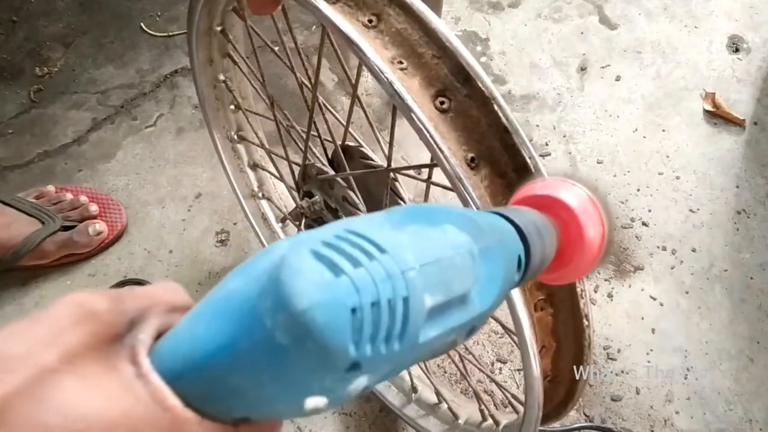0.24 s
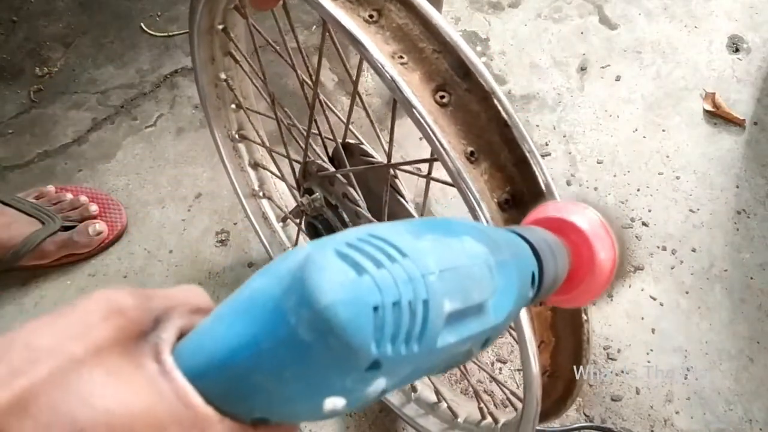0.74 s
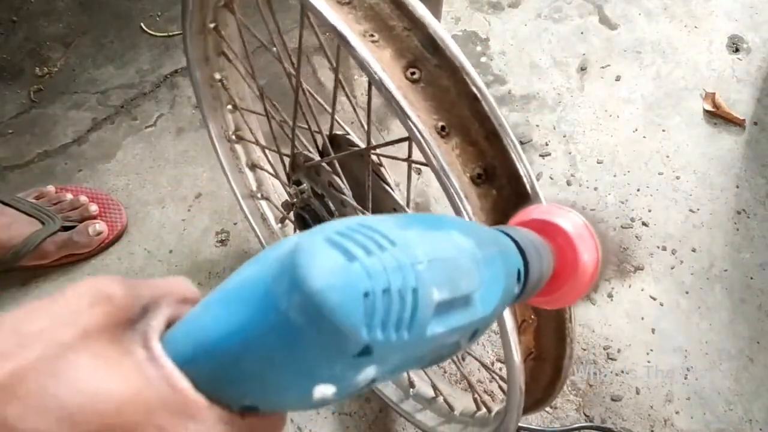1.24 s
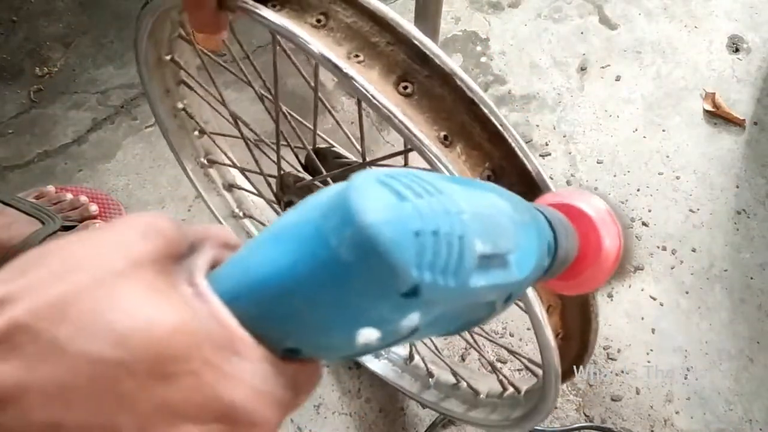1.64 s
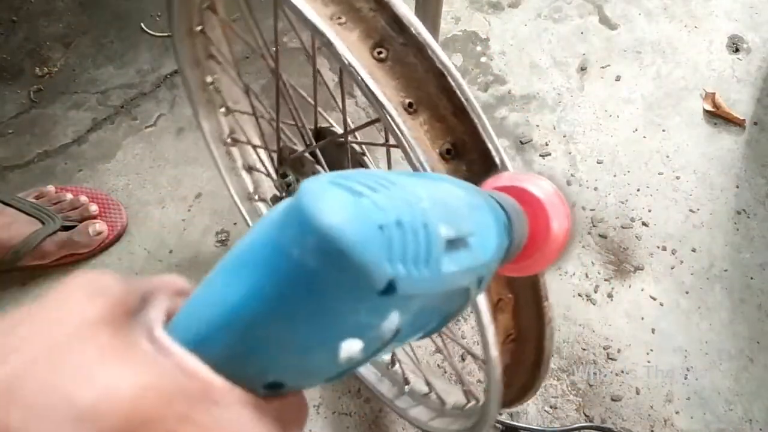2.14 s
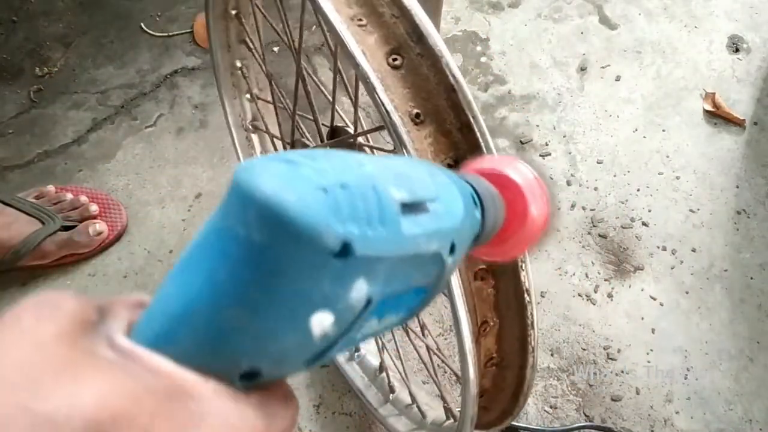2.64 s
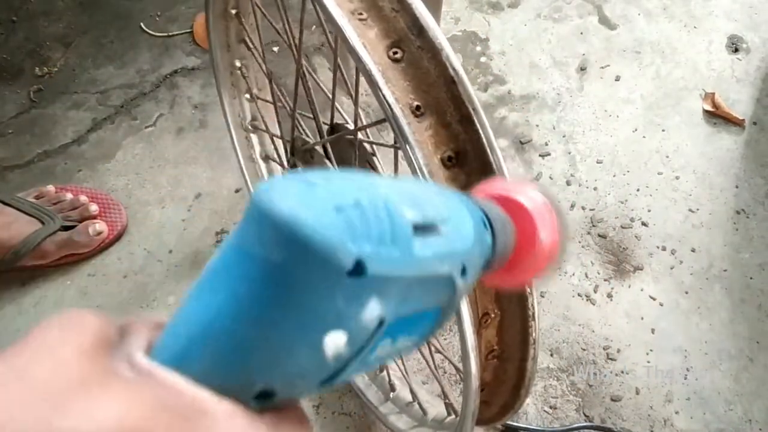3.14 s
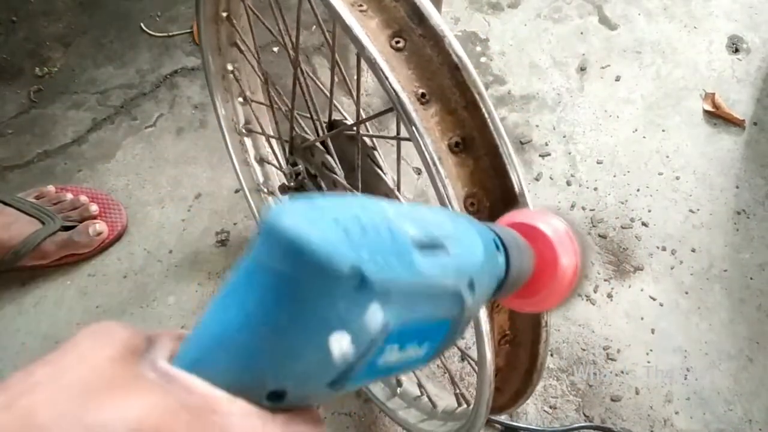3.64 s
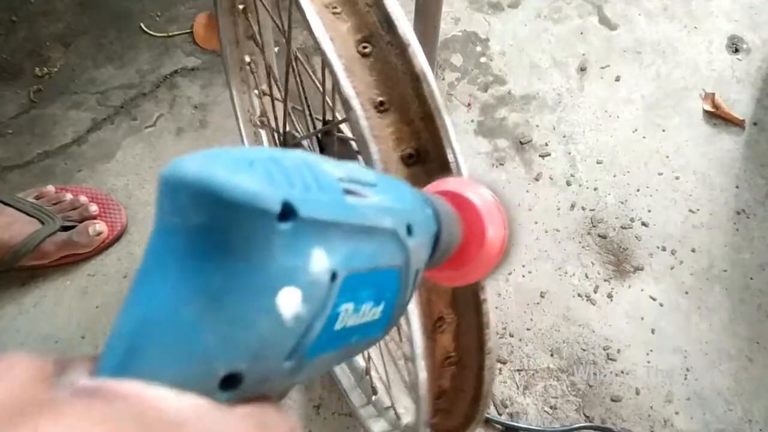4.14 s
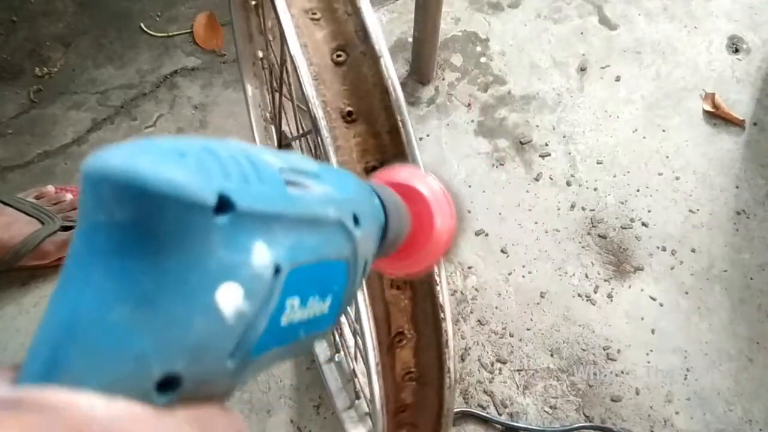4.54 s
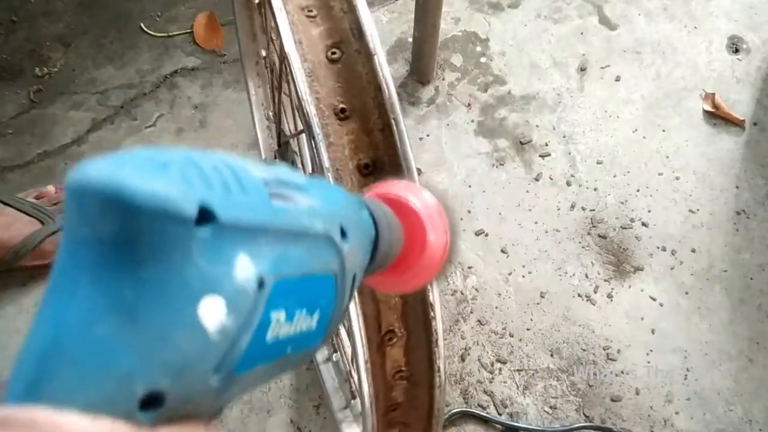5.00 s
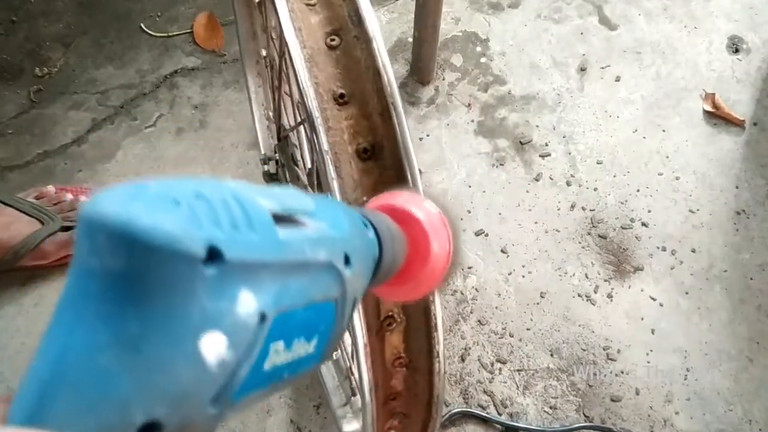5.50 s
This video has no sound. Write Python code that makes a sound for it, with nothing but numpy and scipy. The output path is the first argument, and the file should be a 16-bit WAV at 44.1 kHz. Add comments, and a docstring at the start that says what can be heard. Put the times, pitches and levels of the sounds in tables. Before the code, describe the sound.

An electric drill whines steadily while its spinning wire brush hisses and rasps on a rusty rim, with two spells of dull, bell-like metallic rattling.

```python
"""Wire cup brush on a rusty rim

A hand-held electric drill spins a wire cup brush on a steel wheel rim, close to the microphones.
The motor whines in multiples of its speed; its cooling fan is coloured noise.
The wires scratch out a rasp and a hiss, both modulated by the turning of an uneven cup.
In two stretches the brush rides the edge and bounces: decaying modes ring like a dull bell,
while stick-slip friction, noise through the same resonances, keeps the rim singing."""
import sys
import numpy as np
from scipy import signal
from scipy.fft import rfft, irfft, next_fast_len
from scipy.io import wavfile
from scipy.ndimage import uniform_filter1d, map_coordinates

SR = 44100
rng = np.random.default_rng(int(sys.argv[2]) if len(sys.argv) > 2 else 0)


def output_pcm(signal):
    """Save a mono or channel-first signal as 16-bit PCM at the path in sys.argv[1].

    Samples are clipped to [-1, 1] before scaling.
    """
    pcm = np.clip(np.atleast_2d(signal).T, -1, 1) * 32767
    wavfile.write(sys.argv[1], SR, np.round(pcm).astype(np.int16))


N = 254060


def amp(db):
    """Decibel law: 20 dB is a tenfold amplitude."""
    return 10 ** (np.asarray(db) / 20)


def unit(x):
    """Normalisation to an rms of 1."""
    return x / np.sqrt(np.mean(x ** 2) + 1e-20)


def along(points, hz):
    """Interpolation of (frequency, value) points on a logarithmic frequency axis."""
    f, v = np.transpose(points)
    return np.interp(np.log(hz + 1), np.log(f + 1), v)


def curves(rows):
    """Linear interpolation in time: one value per sample for each column after the time."""
    s, *columns = np.transpose(rows)
    t = np.arange(N) / SR
    return [np.interp(t, s, column) for column in columns]


def bump(middle, half_length):
    """Gaussian envelope: a smooth rise to 1 and fall around a moment."""
    return np.exp(-((np.arange(N) / SR - middle) / half_length) ** 2)


def wobble(rate):
    """Band-limited random fluctuation: a smooth curve through rate random knots a second."""
    at = np.arange(N) * rate / SR
    steps = np.arange(0, at[-1] + 1, 1 / 10)
    knots = rng.standard_normal(int(at[-1]) + 4)
    return np.interp(at, steps, map_coordinates(knots, [steps]))


def filtered(x, response):
    """Linear filtering: the spectrum of x times a response of frequency."""
    m = next_fast_len(N + SR // 2)
    return irfft(rfft(x, m) * response(np.fft.rfftfreq(m, 1 / SR)), m)[..., :N]


def staggered(pair, lead):
    """Inter-channel phase: left leads right by a phase in radians that depends on frequency."""
    sides = np.array([[1], [-1]])
    return filtered(pair, lambda hz: np.exp(.5j * sides * lead(hz)))


# likeness of the two channels, 1 for identical and 0 for unrelated
# columns: frequency_hz, likeness
LIKENESS = [(60, 0.71), (150, 0.73), (380, 0.94), (700, 0.94), (1290, 0.86), (1800, 1), (2400, 0.3),
            (4400, 0)]


def spread(pair):
    """Stereo coherence: left and right most alike mid-range, less in the bass, unrelated in high treble."""
    def mid_side(hz):
        turn = np.arccos(np.clip(along(LIKENESS, hz), 0, 1)) / 2
        return np.array([np.cos(turn), np.sin(turn)])
    mid, side = filtered(pair, mid_side)
    return np.array([mid + side, mid - side])


def rush(spectrum, grain_db, patchy_db):
    """Shaped noise: uneven grains with random, slowly changing level patches over time and frequency."""
    grains = rng.standard_normal((2, N)) * amp(grain_db * wobble(3000))
    z = signal.stft(grains, nperseg=2048)[2]
    field = rng.standard_normal(z.shape)
    field = uniform_filter1d(field, size=3, axis=1)  # over frequency
    field = uniform_filter1d(field, size=24, axis=2)  # over time
    patchy = signal.istft(z * amp(patchy_db * unit(field)), nperseg=2048)[1][:, :N]
    coloured = filtered(patchy, lambda hz: amp(along(spectrum, hz)))
    return unit(spread(coloured))


# colour of the cooling air; columns: frequency_hz, relative_level_db
AIR_COLOUR = [(25, -21), (60, -29), (150, -22.5), (280, -14), (420, -10.5), (530, -4), (800, -5), (920, 3),
              (1120, 1), (1550, 6), (2100, 0.5), (2800, -6), (3120, -19), (3700, -23), (15000, -78)]
# how openly the vents face the microphones as the drill is turned; columns: time_s, opening_db
VENT_OPENING = [(0, -3.5), (.8, -2), (1.3, -1.5), (2.1, 0), (2.8, -2.5), (3.4, -4.5), (4, -0.5), (5, -1),
                (5.76, -0.5)]
FAN_DB, FAN_LAG_S = -40, 0.0001  # level at full vent opening; the left hears the fan this much later


def fan():
    """Turbulence noise: cooling air rushes through the housing, louder as the vents face us."""
    level_db = FAN_DB + curves(VENT_OPENING)[0] + 0.76 * wobble(16)
    air = amp(level_db) * rush(AIR_COLOUR, grain_db=1.5, patchy_db=2.5)
    return staggered(air, lambda hz: -2 * np.pi * hz * FAN_LAG_S)


def mains():
    """Alternating-current torque: a sine of two pulses in each mains cycle."""
    return np.sin(2 * np.pi * 100 * np.arange(N) / SR)


# the motor runs up, then slows where the brush is loaded; columns: time_s, speed_turns_per_s
MOTOR_SPEED = [(0, 469), (.13, 485), (.3, 499.5), (.65, 518), (.95, 526.8), (1.5, 538.6), (1.8, 547),
               (2.05, 552), (2.55, 541), (3.05, 527), (3.3, 512), (3.55, 502), (3.95, 507), (4.25, 505),
               (4.55, 508.3), (5.04, 516.5), (5.35, 517), (5.55, 524), (5.76, 528)]


def motor_angle(ripple=0.00099):
    """Phase as the integral of speed: the speed shivers with the load and the torque pulses."""
    shiver = .0023 * wobble(110)
    speed = curves(MOTOR_SPEED)[0] * (1 + shiver + ripple * mains())
    return 2 * np.pi * np.cumsum(speed) / SR


# gear and commutator tones, each a steady core in a rough skirt
# columns: multiple_of_motor_speed, level_db, gain_db_per_db_of_vent_opening, skirt_over_core_factor
MOTOR_TONES = [(1, -57, 4, 0.57), (3, -52.5, 0, 0.7), (6, -49, 3.5, 1.1), (9, -55.5, 3.5, 1.2),
               (12, -46.5, 0.7, 0.67), (15, -56, 1, 2.5), (18, -45, 2.8, 1.3), (24, -54, 2, 1.2)]
# single tones sing out for a while
# columns: multiple_of_motor_speed, middle_s, half_length_s, gain_db
TONE_SWELLS = [(3, 3.3, 1, 10.5), (6, 5.12, 0.65, 6.5), (9, 5.3, 0.82, 9), (12, 0.042, 0.18, 5),
               (12, 4, 0.34, 3), (12, 5.25, 0.45, 8), (15, 2.35, 1, 15), (18, 4.83, 0.62, 6.5),
               (24, 4.7, 0.66, 9)]


def whine(angle, drift_db=4.0, throb=0.14):
    """Harmonics of rotation: tones at multiples of the motor speed, by separate paths to each side."""
    def tone(order, rough):
        drift = amp(drift_db * np.array([wobble(8.2), wobble(11.0)]))
        core = drift * np.exp(1j * np.array([wobble(5.4), wobble(6)]))
        skirt = rough * np.array([wobble(280) + 1j * wobble(280) for _ in range(2)])
        wave = np.real((core + skirt) * np.exp(1j * order * angle))
        return unit((1 + throb * mains()) * wave)

    def swell_db(order):
        return sum(db * bump(s, half) for k, s, half, db in TONE_SWELLS if round(k) == order)

    opening_db, = curves(VENT_OPENING)
    out = amp(-80.0) * mains()  # faint hum
    for multiple, db, follow, rough in MOTOR_TONES:
        order = round(multiple)
        level_db = db + follow * opening_db + swell_db(order)
        out = out + amp(level_db) * tone(order, rough)
    return out


# the cup digs in (positive) or skips clear (negative) for a moment
# columns: middle_s, half_length_s, pressure_db
PRESSURE_SHOVES = [(.01, 0.017, 2.5), (.34, 0.041, 1), (.65, 0.021, 2.5), (1.152, 0.012, -1.5),
                   (1.233, 0.019, -4), (1.259, .012, 3), (1.3, .018, -3.5), (1.416, 0.051, 2),
                   (2.384, 0.016, 1), (2.425, .012, -3), (2.52, 0.015, 0.5), (2.64, 0.017, -0.5),
                   (2.72, 0.018, 1.5), (2.828, 0.038, -3.5), (2.885, 0.011, 1), (3.0, 0.014, -2),
                   (3.062, 0.0065, 2.5), (3.14, .012, -2), (3.176, 0.013, 0), (3.24, 0.017, 1.5),
                   (3.296, 0.012, -2.5), (3.365, .012, -1.5), (3.418, 0.023, -1.5), (3.46, .012, -1),
                   (3.62, .012, 0), (3.707, 0.023, -3.5), (3.765, .018, 0), (3.84, 0.045, -2)]


def shoves_db():
    """Contact force: the pressure gained or lost as the cup digs in and skips clear."""
    return sum(db * bump(s, half) for s, half, db in PRESSURE_SHOVES)


CATCH_S = 0.09  # time to slip on or off the edge


def on_edge(start, end):
    """Change of contact: 0 on the rim's face, 1 while the brush rides on its edge."""
    t = np.arange(N) / SR
    return np.clip(.5 + np.minimum(t - start, end - t) / CATCH_S, 0, 1)


# the rim's modes, before a blow's own weighting and choking or the friction's bass cut
# columns: frequency_hz, relative_level_db, t60_s
RIM_MODES = [(1230, -9, .27), (1247, 1.5, .19), (1289, -3.5, .04), (1447, -1.5, .19), (1514, -15, .25),
             (1573, -2.5, .04), (1650, -16.5, .25), (1765, -3.5, .09), (1892, -8, .04), (2090, -20, .16),
             (2264, -8, .12), (2345, -15.5, .12), (2659, -4, .045), (2891, -15.5, .1), (2997, -12, .1),
             (3136, -7.5, .11), (3275, -14, .09), (3612, -8, .05), (4305, -9.5, .045)]
# the brush rides on the rim's edge
# columns: start_s, end_s, first_ringing_db, last_ringing_db, brightness_db_per_octave
EDGE_RIDES = [(0.012, 1.51, -36.5, -40, 5), (2.403, 3.837, -42.5, -41, 4)]
FACE_RING_DB = -51  # ringing on the flat face
SHOVE_RING = 0.86  # dB of singing in the rim for each dB of pressure


def drag(low_hz=1130, steadiness=0.79):
    """Stick-slip excitation: friction noise keeps the modes singing, most of all the long-ringing ones."""
    def resonance(f):
        power = 0
        for hz, db, t60 in RIM_MODES:
            half_width = np.log(1000) / (2 * np.pi * t60)
            power = power + t60 * amp(db) ** 2 / ((f - hz) ** 2 + half_width ** 2)
        return np.sqrt(power * f) * np.minimum(f / low_hz, 1) ** 6

    friction = rng.standard_normal((2, N)) * amp(3.5 * wobble(120))
    singing = unit(spread(filtered(friction, resonance)))
    # the wires brake a wide swing, so the singing stays fairly even
    energy = uniform_filter1d(np.mean(singing ** 2, axis=0), size=SR // 50)
    swing = np.sqrt(np.abs(energy) + 1e-6)
    singing = unit(singing / swing ** steadiness)
    out = amp(FACE_RING_DB) * singing
    for start, end, first_db, last_db, tilt_db in EDGE_RIDES:
        level_db, = curves([(start, first_db), (end, last_db)])
        tilt = lambda hz: amp(tilt_db * np.log2(np.maximum(hz / low_hz, 1)))
        out = out + on_edge(start, end) * amp(level_db) * unit(filtered(singing, tilt))
    return out * amp(SHOVE_RING * shoves_db())


DEEP_BELOW_HZ = 1350  # modes below are deep, the others overtones


def ring(length, scatter_db=5.5):
    """Modal decay after one blow: deep modes and overtones, each in stereo and of rms 1 in the attack."""
    t = np.arange(SR // 5) / SR
    hz, db, t60 = np.array(RIM_MODES).T[:, :, None]
    # many wires land in turn, which softens the attack and favours long-ringing modes
    landing = 1 - np.exp(-t / .0008)
    # part of the ring is choked quickly by the wires, the rest dies freely
    choke = 1 + .7 * amp(-60 * t / .06)
    decay = amp(db - 60 * t / (t60 * length))
    modes = t60 ** (1 / 4) * decay * landing * choke
    # every blow lands elsewhere; the higher modes reach the two microphones less alike
    size, phase, skew = rng.standard_normal((3, len(RIM_MODES), 1))
    angle = 2 * np.pi * hz * t + phase * (hz / 1900) ** 2
    skew = skew * (hz / 2500) ** 2
    waves = np.array([amp(scatter_db * size) * modes * np.sin(angle + side * skew) for side in (1, -1)])
    # springy wires strike softly, and the narrow steel radiates no bass
    contact = signal.butter(2, 1950, "low", fs=SR, output="sos")
    radiate = signal.butter(6, 1100, "high", fs=SR, output="sos")
    path = np.vstack([contact, radiate])
    deep = hz[:, 0] < DEEP_BELOW_HZ
    parts = [signal.sosfilt(path, waves[:, group].sum(axis=1)) for group in (deep, ~deep)]
    return [part / np.std(part[:, :SR // 80]) for part in parts]


# the bounces on the edge, levels before the small trims in bounces()
# columns: start_s, deep_modes_db, overtones_db, t60_factor
EDGE_BOUNCES = [(0.0153, -40, -37, 0.93), (0.0568, -32, -39, 1.1), (0.071, -33, -39, 1.5),
                (0.1143, -32, -36, 1.7), (0.1417, -35.5, -34.5, 2.2), (0.198, -31.5, -41, 1.6),
                (0.229, -39, -34.5, 1.5), (0.2503, -32, -36, 1.5), (0.268, -36, -35, 1.7),
                (0.3242, -39, -33, 1.6), (0.353, -30.0, -31, 1.7), (0.382, -33, -36, 2),
                (0.41, -39, -35, 1.6), (0.446, -32.5, -35, 1.3), (0.4698, -37, -31.5, 6.4),
                (0.532, -32, -36, 1.1), (0.5502, -33.5, -44, 1.5), (0.5916, -41, -53, 0.6),
                (0.6565, -31.5, -33, 1.4), (0.711, -36, -43, 1), (0.729, -39, -36, 1.4),
                (0.761, -34, -35, 1.1), (0.7776, -33.5, -35.5, 3.7), (0.813, -34, -32, 1.5),
                (0.857, -38, -39, 1.2), (0.884, -32.5, -33.5, 1.8), (0.9103, -31.5, -34, 1.7),
                (0.937, -33.0, -35.5, 3.2), (0.97, -44, -33, 2.3), (1.01, -36.5, -35, 1.5),
                (1.064, -31, -34.5, 0.58), (1.117, -32.5, -43, 0.4), (1.1927, -32, -39, 1.7),
                (1.2683, -33, -35.5, 1.1), (1.3765, -30.5, -40, 0.44), (1.476, -33.5, -32, 0.99),
                (2.4017, -34, -35, 1.1), (2.4486, -33.5, -31, 1.4), (2.513, -58, -42, 1.1),
                (2.5513, -28.5, -38, 3.5), (2.6014, -35.5, -32.5, 1.8), (2.6537, -31.5, -35, 2.5),
                (2.692, -37, -38, 2.3), (2.752, -32, -32, 3.8), (2.8021, -28, -34, 4.3),
                (2.8635, -55, -35, 1.3), (2.9337, -29.5, -36, 2.4), (2.9885, -74, -32.5, 0.86),
                (3.0676, -35, -35, 0.68), (3.1153, -27, -36, 1.1), (3.173, -38.5, -50, 0.42),
                (3.2221, -32.5, -34, 1.5), (3.269, -30.5, -31.5, 0.36), (3.31, -35.5, -37, 1.3),
                (3.3287, -31, -42, 2.1), (3.376, -27.5, -37, 2.7), (3.4362, -32.5, -35, 1.3),
                (3.4836, -29.5, -33.5, 2.6), (3.5195, -40, -32.5, 3), (3.5673, -33.5, -31.5, 1.3),
                (3.6076, -47, -33.5, 1.4), (3.625, -40, -31.5, 1.1), (3.681, -29, -35, 1.1),
                (3.7886, -30, -32, 1.55)]


def bounces(deep_db=-1.07, overtone_db=-0.64, smother_s=0.0026):
    """Impact excitation: each bounce rings the rim anew; where the wires land sets the share of overtones."""
    out = np.zeros((2, N + SR))
    gaps = np.diff([row[0] for row in EDGE_BOUNCES], append=N / SR)
    for (s, low_db, high_db, length), gap in zip(EDGE_BOUNCES, gaps):
        deep, overtones = ring(length)
        blow = amp(low_db + deep_db) * deep + amp(high_db + overtone_db) * overtones
        # the brush smothers the old ring as it comes down for the next blow
        t = np.arange(blow.shape[1]) / SR
        smother = np.clip((gap - t) / smother_s, 0, 1)
        out[:, round(s * SR):][:, :blow.shape[1]] += smother * blow
    return out[:, :N]


# the rim's sound reaches the microphones out of step; columns: frequency_hz, left_lead_rad
RIM_PHASE = [(300, 0), (900, -2.3), (1260, -0.61), (1450, 0.73), (1780, -0.96), (2300, -0.45), (3100, 1)]


def rim():
    """Resonant radiation: the singing and the blows reach the two microphones out of step."""
    return staggered(drag() + bounces(), lambda hz: along(RIM_PHASE, hz))


SCRAPE_DB, EDGE_SCRAPE_DB = -36.5, -0.5  # base of the wires' level; fewer wires touch on the edge
BITE_DB, BITE_LEAD_S, BITE_S = 3.5, 0.0046, 0.011  # before the strongest bounce; weaker ones bite less
LIFT_DB, LIFT_LAG_S, LIFT_S = -3.5, 0.019, 0.034  # after it, scaled likewise


def pressure_db(edge):
    """Contact force: unsteady, lighter on the edge; each bounce is a bite, then a lift."""
    hardest_db = max(row[1] for row in EDGE_BOUNCES)
    hops = 0
    for s, db, *rest in EDGE_BOUNCES:
        bite = BITE_DB * bump(s - BITE_LEAD_S, BITE_S)
        lift = LIFT_DB * bump(s + LIFT_LAG_S, LIFT_S)
        hops = hops + amp(db - hardest_db) * (bite + lift)
    unsteady_db = .4 * edge * wobble(20) + .5 * wobble(45)
    return SCRAPE_DB + hops + shoves_db() + edge * EDGE_SCRAPE_DB + unsteady_db


# colours of the coarse rasp and the fine hiss; columns: frequency_hz, relative_level_db
RASP_COLOUR = [(1500, -20.5), (2400, -5.5), (2750, -8.5), (3100, -5), (3500, -1), (3850, -1), (4350, 0.5),
               (4620, 3), (4780, 0.5), (4980, 1.5), (5200, 1), (5600, 2), (6100, 1.5), (7000, -2.5),
               (9000, -40), (16000, -38)]
HISS_COLOUR = [(2000, -23.5), (5000, -19), (6400, -6), (7050, -3.5), (7800, 2.5), (9500, 2), (10500, -2),
               (12000, -3.5), (13500, -9), (16000, -16.5)]
# the rasp as the cup lies flatter on the rust, before RASP_GAIN_DB; columns: time_s, level_db
RASP_LEVEL = [(0, -12), (.8, -11), (1.3, -10.5), (1.8, -9), (2.8, -6.5), (3.3, -7), (4.0, -5.5), (4.6, -7),
              (5.76, -8)]
# single wires snag on the edge; columns: middle_s, rasp_gain_db
WIRE_SNAGS = [(.92, 7), (1.26, 4.5), (3.48, 2)]
# the tilted cup beats with the turn, and runs smoother when it lies flat; columns: time_s, depth_factor
CUP_FLUTTER = [(0, 0.77), (1.3, 1.5), (1.9, 0.99), (2.4, 1.1), (4, 0.36), (5.76, .4)]
RASP_GAIN_DB, HISS_GAIN_DB = 5.5, 1.37
SNAG_S = 0.012  # half length


def wires(spindle, edge):
    """Amplitude modulation by rotation: tips scratch the rust as the uneven cup presses and rocks."""
    uneven = .085 * np.sin(spindle) + .075 * np.sin(2 * spindle) + .055 * np.cos(3 * spindle)
    rock = .045 * np.sin(spindle / 2)  # every second turn
    buzz = .05 * mains()
    press = (1 + curves(CUP_FLUTTER)[0] * uneven + rock + buzz) * amp(pressure_db(edge))
    snag_db = sum(db * bump(s, SNAG_S) for s, db in WIRE_SNAGS)
    rasp_db = curves(RASP_LEVEL)[0] + snag_db + RASP_GAIN_DB
    rasp = amp(rasp_db) * rush(RASP_COLOUR, grain_db=2.3, patchy_db=4.3)
    hiss = amp(HISS_GAIN_DB) * rush(HISS_COLOUR, grain_db=1.8, patchy_db=2.0)
    return press * (rasp + hiss)


GEAR_RATIO = 13  # motor turns per turn of the brush


def scene():
    """Superposition: the motor turns the brush through its gears; the brush scrapes and rings the rim."""
    angle = motor_angle()
    edge = sum(on_edge(start, end) for start, end, *levels in EDGE_RIDES)
    return fan() + whine(angle) + rim() + wires(angle / GEAR_RATIO, edge)


TOP_HZ = 15870


def record(dry):
    """Band limiting: nothing passes at or above the top frequency."""
    return filtered(dry, lambda hz: hz < TOP_HZ)


dry = scene()
out = record(dry)
output_pcm(out)
```